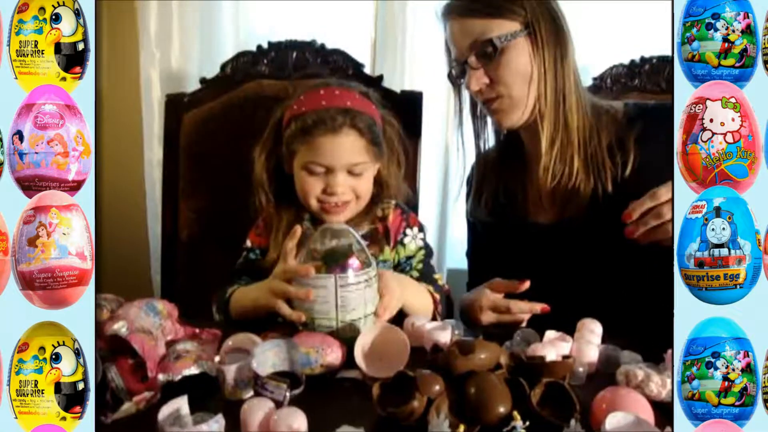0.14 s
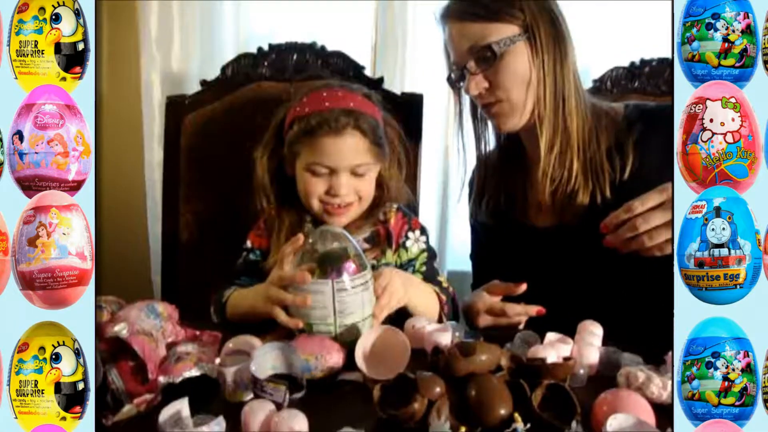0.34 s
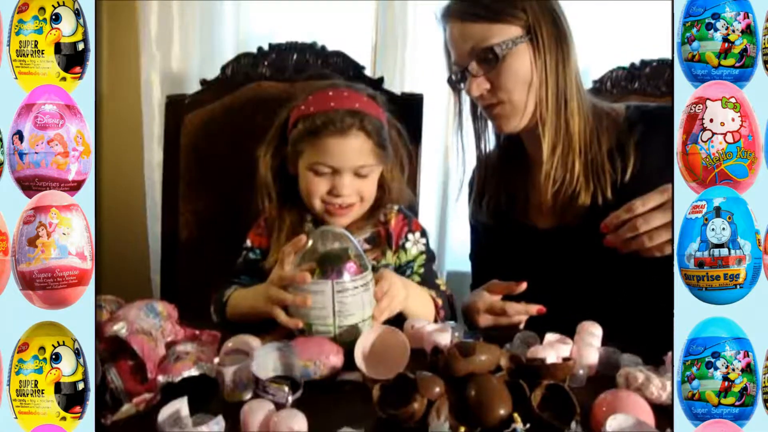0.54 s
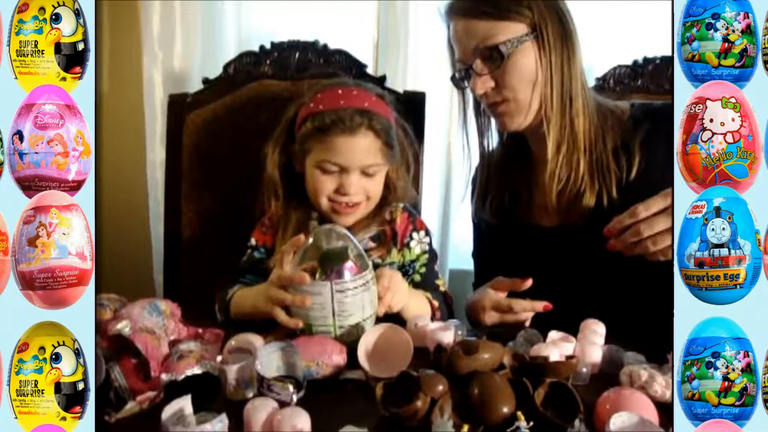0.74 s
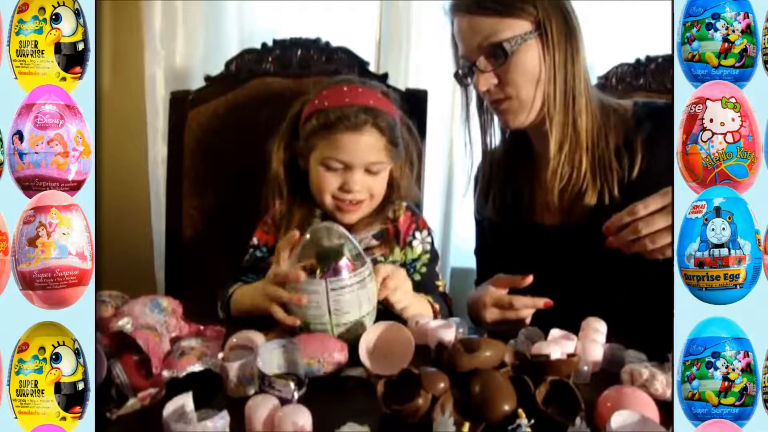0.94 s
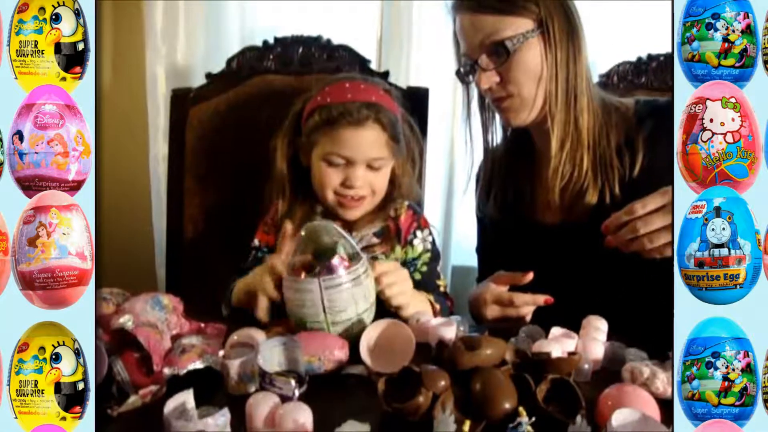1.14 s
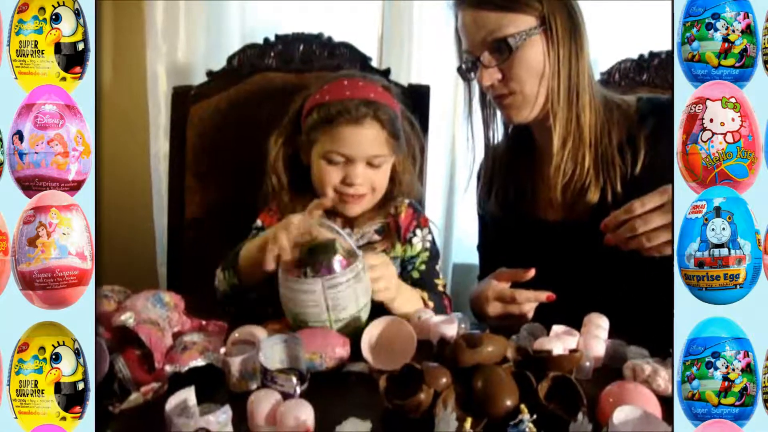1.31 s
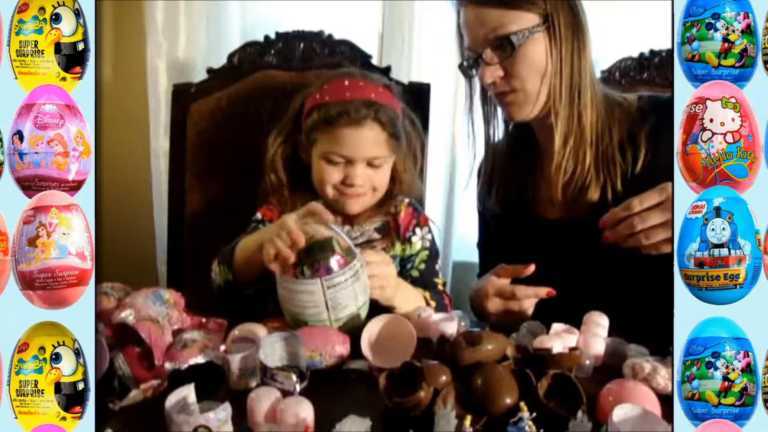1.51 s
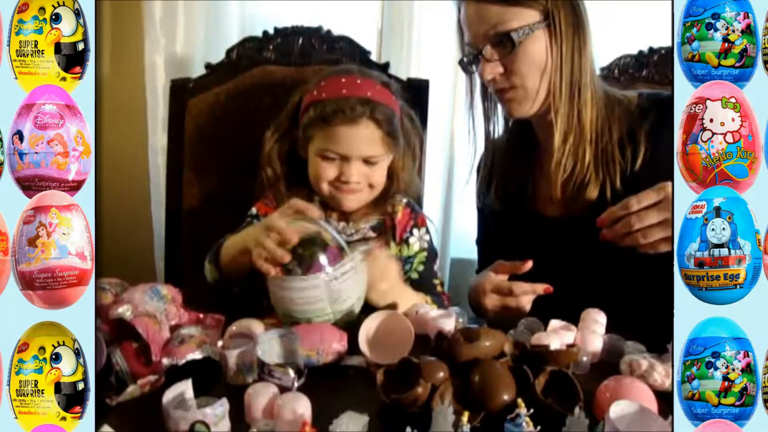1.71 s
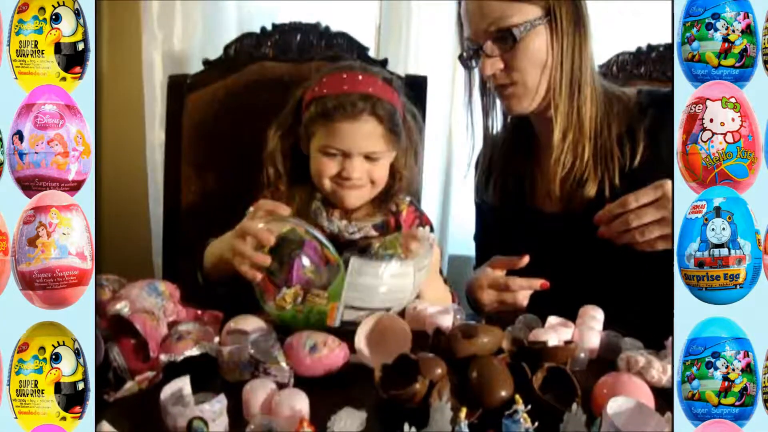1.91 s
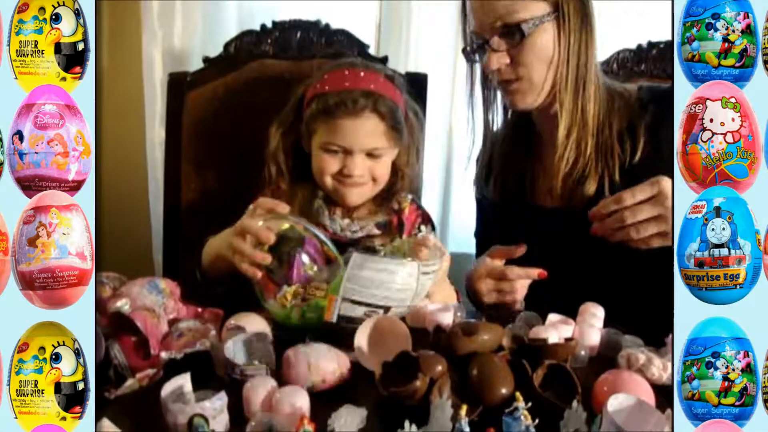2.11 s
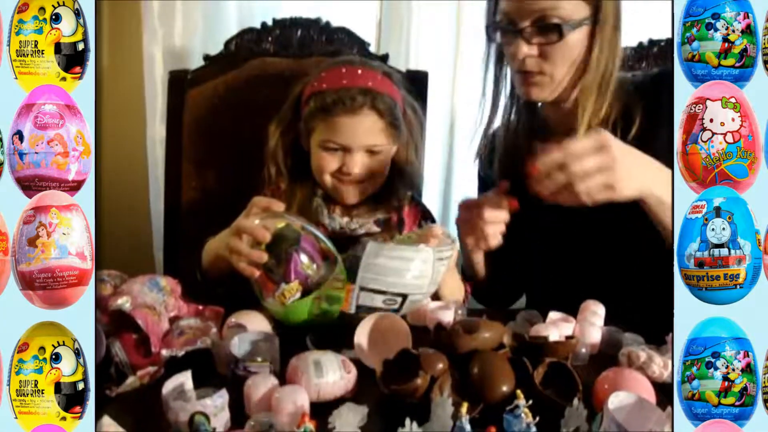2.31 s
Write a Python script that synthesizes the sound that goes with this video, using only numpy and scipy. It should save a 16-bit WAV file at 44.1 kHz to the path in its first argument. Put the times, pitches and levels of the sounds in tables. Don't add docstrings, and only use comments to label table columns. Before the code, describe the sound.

A taped hollow plastic egg is opened by hand. Light picking clicks quicken into a short tear near 0.45 seconds, jerky peeling crackles at 0.64 to 1.05, then sparser prying with a hard snap at 1.3. The halves give at 1.6 and rip loudly around 1.7 to 1.8; scattered snaps last until 2.05, with one faint tick at 2.25. Small room echo, dull table bumps, faint hum and hiss.

```python
import sys
import numpy as np
from scipy import signal
from scipy.fft import rfft, irfft, next_fast_len
from scipy.io import wavfile
from scipy.ndimage import uniform_filter1d

SR = 44100
rng = np.random.default_rng(int(sys.argv[2]) if len(sys.argv) > 2 else 0)


def volts_from_db(level):
    exponent = np.asarray(level, float) / 20
    return 10 ** exponent


def generate_wav(sig):
    pcm = np.round(np.clip(np.atleast_2d(sig).T, -1, 1) * 32767).astype(np.int16)
    wavfile.write(sys.argv[1], SR, pcm)


N = 103635
TOP_HZ = 10150


def unit(x):
    return x / np.sqrt(np.mean(x ** 2) + 1e-20)


def along(points, hz):
    f, value = np.transpose(points)
    return np.interp(np.log(hz + 1), np.log(f + 1), value)


def filtered(x, response):
    m = next_fast_len(len(x) + 8192)
    return irfft(rfft(x, m) * response(np.fft.rfftfreq(m, 1 / SR)), m)[:len(x)]


def place(times, sounds):
    at = np.round(times * SR).astype(int)[:, None] + np.arange(sounds.shape[1])
    return np.bincount(at.ravel(), sounds.ravel(), N + SR)[:N]


def fading(t, t60):
    rise_s = 0.00064
    return volts_from_db(-60 * t / t60) * (1 - np.exp(-t / rise_s))


# pitch_hz [Hz], level_db [dB per Hz]
HISS_SPECTRUM = [(15, -33.5), (25, -7), (172, -27.5), (233, 13.5), (284, 6.5), (996, 7.5), (1160, 5.5),
                 (2580, 6), (10000, -3.5), (13000, -58), (22000, -120)]
# pitch_hz [Hz], width_hz [Hz], level_db [dB]
HUM_BANDS = [(107.2, 10, -73), (163.5, 11, -76.5)]
# start_s [s], level_db [dB]
BACKGROUND_FADE = [
    (.5, 12),
    (.6, 5.5),
    (1.9, 2.5),
]


def background():
    hiss = unit(filtered(rng.standard_normal(N), lambda hz: volts_from_db(along(HISS_SPECTRUM, hz))))
    total = volts_from_db(-59.5) * hiss
    for centre, width, db in HUM_BANDS:
        band = filtered(rng.standard_normal(N), lambda hz: 1 / (1 + ((hz - centre) / width) ** 2))
        total = total + volts_from_db(db) * unit(band)
    return total * volts_from_db(np.interp(np.arange(N) / SR, *np.transpose(BACKGROUND_FADE)))


# start_s [s], level_db [dB]
JOLT_EVENTS = [
    (0.446, -34),
    (0.761, -41),
    (0.822, -54),
    (0.882, -41),
    (1.3189, -37),
    (1.51, -44),
    (1.588, -42.5),
    (1.69, -38.5),
]


def jolts():
    start_s, level_db = np.transpose(JOLT_EVENTS)
    t = np.arange(SR // 50) / SR
    peak_s = 0.0004
    return place(start_s, volts_from_db(level_db)[:, None] * t / peak_s * np.exp(1 - t / peak_s))


# pitch_hz [Hz], t60_s [s]
ROOM_DECAY = [(200, 0.063), (1000, 0.44), (4000, 0.3), (10000, .3)]
# delay_s [s], level_db [dB]
REFLECTIONS = [
    (.0065, -12.5),
    (.017, -16.5),
]


def room(x):
    out = np.zeros(N + SR)
    stretch = SR // 16
    span = SR // 2
    t = np.arange(span) / SR
    build_s, smear_s, tail_db, dull_hz = 0.0069, 0.00083, -7, 6940
    for a in range(0, N, stretch):
        hz, frame_s, z = signal.stft(rng.standard_normal(span), SR, nperseg=256)
        z = z * volts_from_db(-60 * frame_s / along(ROOM_DECAY, hz)[:, None])
        tail = signal.istft(z, SR, nperseg=256)[1][:span]
        tail = tail * (1 - np.exp(-(t / build_s) ** 2))
        tail = volts_from_db(tail_db) * tail / np.linalg.norm(tail)
        for delay_s, level_db in REFLECTIONS:
            echo = rng.standard_normal(span) * np.exp(-((t - delay_s) / smear_s) ** 2)
            tail = tail + volts_from_db(level_db) * echo / np.linalg.norm(echo)
        wet = signal.fftconvolve(x[a:a + stretch], tail)
        out[a:][:len(wet)] += wet
    return filtered(out[:N], lambda hz: 1 / (1 + 1j * hz / dull_hz))


# pitch_hz [Hz], level_db [dB per Hz]
FILM_COLOUR = [(120, -69.5), (200, -4.5), (468, -49), (552, -5), (844, -4), (1520, -2), (3570, 2.5),
               (7090, 0.5), (10000, -4.5), (13000, -53), (22000, -120)]


def film(x):
    def response(hz):
        colour = volts_from_db(along(FILM_COLOUR, hz))
        return colour / np.sqrt(np.mean(colour ** 2 * (hz < TOP_HZ)))
    return filtered(x, response)


RING_DB = 8
# start_s [s], end_s [s], level_db [dB]
TEARS = [
    (0.445, 0.478, -25),
    (1.581, 1.657, -29),
    (1.693, 1.794, -21),
]


def crackle(count=8, torn=150):
    trail_s, grain_db, spread_db, scatter_octaves = 0.02, -20, 1.5, 0.28
    shape = (len(SLIPS), count)
    begin_s, end_s, tear_db = np.transpose(TEARS)[:, :, None]
    tear_shape = (len(TEARS), torn)

    trailing_s = SLIPS[:, :1] + trail_s * rng.random(shape)
    trailing_db = SLIPS[:, 1:2] + RING_DB + grain_db - spread_db * np.log(rng.random(shape) + 0.14)
    slip_hz = SLIPS[:, 2 + np.arange(count) % 2]
    trailing_hz = slip_hz * 2 ** (scatter_octaves * rng.standard_normal(shape))

    tearing_s = begin_s + (end_s - begin_s) * rng.random(tear_shape)
    tearing_db = tear_db + 2 * spread_db * rng.standard_normal(tear_shape)
    tearing_hz = 1000 * 2 ** rng.uniform(0, np.pi, tear_shape)

    start_s = np.append(trailing_s, tearing_s)
    level = volts_from_db(np.append(trailing_db, tearing_db))[:, None]
    hz = np.append(trailing_hz, tearing_hz)[:, None]
    t = np.arange(SR // 200) / SR
    ping = 2 * np.sin(2 * np.pi * hz * t) + 0.82 * rng.standard_normal((len(hz), len(t)))
    return film(place(start_s, level * fading(t, 0.0039) * ping))


# pitch_hz [Hz], level_db [dB]
SHELL_MODES = [(590, -2.5), (820, 2.5), (1150, 0)]
# [dB, shell over snap]
PICKING = [(0.055, -30, 3120, 6520.0, -3.5), (0.1143, -29, 3000, 5580.0, -8),
           (0.1323, -33.5, 5300, 5900.0, -4), (0.1491, -43, 2730.0, 3900.0, -3),
           (0.164, -56, 3060, 3750.0, -20), (0.1725, -23, 2980, 3940.0, -22),
           (0.1807, -33, 3010.0, 5660.0, -13), (0.19, -27, 3070, 5080.0, -8.5),
           (0.214, -15.5, 3200, 5280.0, -9), (0.2642, -28, 2920, 5120.0, 3.5),
           (0.2796, -19.5, 3010.0, 2200.0, -7.5), (0.2843, -27.5, 5020, 2950.0, -24),
           (0.2891, -22.5, 2600, 5750.0, -24), (0.3108, -27.5, 2950.0, 4260.0, -16),
           (0.3219, -25, 2680, 6630.0, -27), (0.3373, -15.5, 5460, 6890.0, -30),
           (0.3449, -39, 4760, 6240.0, -20), (0.354, -48, 4520, 2630.0, -20),
           (0.4072, -40.0, 2620, 4740.0, 8.0), (0.4346, -25.5, 2720, 4460.0, -7.5),
           (0.4408, -35, 2830, 5320.0, -5.0), (0.445, -13.5, 6120, 5080.0, -12),
           (0.4515, -14.5, 6850, 5320.0, -6.5), (0.4612, -12.5, 3800, 2840.0, -14.5),
           (0.4674, -11.5, 3700, 5600.0, -6.5), (0.4709, -10.5, 6840, 2370.0, -13),
           (0.4966, -20.0, 3570, 5060.0, -10), (0.5375, -25, 2420, 5600.0, -22)]
# start_s, level_db, pitch_hz, second_pitch_hz [Hz], knock_db
PEELING = [(0.6401, -25.5, 6760.0, 2350, -5.5), (0.6449, -11, 6420, 2610, -9),
           (0.6547, -35, 3810, 7300, -26), (0.6632, -33, 4300, 2530, -10.5), (0.671, -13.5, 3150, 4920, -5),
           (0.6771, -14.5, 5310, 2550, -16), (0.6854, -17.5, 2510, 3450, -37),
           (0.7115, -19, 3540, 6030, -3.5), (0.7162, -13, 3260, 5970, -5),
           (0.7334, -17.5, 3610, 5370, -4.5), (0.7497, -18.5, 3080, 4710, -24),
           (0.759, -10.5, 4700, 5540, -8.5), (0.7635, -16.0, 4850, 3010, -21),
           (0.774, -19.5, 5070, 3320, -5.0), (0.7923, -14.0, 5630, 4450, -12),
           (0.8143, -12.0, 4880, 7080, -4.5), (0.8306, -20, 4510, 7200, 3),
           (0.8386, -16, 4570.0, 3650, -29), (0.8444, -20.5, 2470, 4680, -8.5),
           (0.8754, -17, 6520, 2890, -12.5), (0.8822, -15.5, 2500, 3440, -11.5),
           (0.8967, -21.5, 2380, 3470, -27), (0.9433, -30.5, 3530, 7130, -10),
           (0.963, -28.5, 3360, 2540, -8), (0.968, -22.5, 6610, 2400, -6),
           (0.9935, -15.0, 5580, 2680, -3.5), (1.0065, -14.5, 2700, 4600, -10.5),
           (1.014, -12.5, 4600, 3550, -8.5), (1.0209, -9.5, 3740, 4790, -11),
           (1.0321, -19, 4750, 2500, -8.5), (1.0478, -23.5, 4700, 2720, -15.0),
           (1.0658, -28, 5030, 2980, -17.0)]
# start_s, level_db, pitch_hz, second_pitch_hz [Hz], knock_db
PRYING = [(1.1122, -28, 3380, 2980, -2.5), (1.1246, -43, 4600, 3700, -14), (1.1549, -25, 4810, 5800, -4),
          (1.161, -38, 5870, 4650, -11), (1.1857, -41.5, 3560, 5650, -9), (1.208, -35, 4620, 3030, -27),
          (1.2324, -26, 3570, 2190, -8), (1.2396, -40.5, 3700, 4840, -30), (1.248, -47, 3790.0, 4540, -17),
          (1.2605, -56.5, 4240.0, 2600, -20), (1.2739, -24, 3510, 2350, -3.5),
          (1.2842, -14, 3820, 4460, -34), (1.3013, -25, 3230.0, 2360, -26),
          (1.315, -6.5, 3580, 5990, -18.5), (1.3221, -16.0, 3660, 4920, -43),
          (1.3328, -14.5, 3260, 4380, -16), (1.3396, -19.0, 3600, 4950.0, -20),
          (1.403, -28, 3580, 5670, -43), (1.4405, -29.5, 3660, 2050.0, -7.5),
          (1.4629, -24.0, 5100, 3660, -6.5), (1.47, -20.5, 3580, 4660, -49), (1.4815, -17, 5690, 3800, -11),
          (1.4999, -24, 6370.0, 5150, -17.5), (1.5106, -14.5, 4140, 2680, -19.0),
          (1.52, -14.5, 3500, 5950, -14), (1.5255, -14, 3400, 5450, -19), (1.5699, -16.5, 4800, 3530, -17),
          (1.59, -15, 5570, 3330, -17), (1.5953, -13, 7240, 2850, -15), (1.6213, -19.5, 5380.0, 7100, -17),
          (1.625, -17.5, 5580, 6300, -15), (1.634, -21, 5800, 4750, -8), (1.6634, -17, 5340, 8740, -20)]
# start_s, level_db, pitch_hz, second_pitch_hz [Hz], knock_db
RIPPING = [(1.6894, -10, 4200, 6790, -16), (1.6941, -10.5, 5170, 7370, -57),
           (1.6989, -16.5, 6600, 5130, -15), (1.7068, -16, 5600, 3000, -14),
           (1.7287, -13.5, 5110, 4240, -11), (1.7461, -17, 5000, 2770, -8), (1.7589, -12.5, 2970, 4170, -4),
           (1.795, -10.5, 3100, 5150, -15.5), (1.8071, -17.5, 2460, 5130, -18),
           (1.842, -19, 3060, 2010, -11.5), (1.8787, -29, 2350.0, 4670, -13),
           (1.9339, -18.5, 6940, 3400, -34), (1.9377, -19.5, 5600, 2140, -37),
           (1.9538, -26, 2400, 3930, -24), (1.9623, -30, 5640, 3730.0, -28),
           (1.9743, -11.5, 5100, 7620, -15), (1.9872, -12, 2390, 4570, -11.5),
           (1.9933, -22.5, 3450, 2330, -32), (1.9985, -19, 2400, 4100, -29), (2.0206, -9, 3870, 2260, -15),
           (2.0312, -12.5, 2500, 5495, -22), (2.0511, -26, 2390, 3900, -27),
           (2.2498, -34.5, 4330, 8100, -11.5)]
# start_s, level_db, pitch_hz, second_pitch_hz [Hz], knock_db
FURTHER = [
    (0.7197, -18.5, 4300, 3050, -4),
    (1.3637, -19, 3300, 4920, -4),
    (1.7265, -10.5, 5440, 6620, -19),
]
SLIPS = np.concatenate([PICKING, PEELING, PRYING, RIPPING, FURTHER])


def snaps():
    start_s, level_db, pitch_hz, second_hz, knock_db = SLIPS.T[:, :, None]
    count = len(SLIPS)
    t = np.arange(SR // 30) / SR
    noise, flicker = rng.standard_normal((2, count, len(t)))
    crack_s, ring_s, knock_s, lead_s = 0.012, 0.0066, 0.016, 0.002

    crack = volts_from_db(level_db - 3) * fading(t, crack_s) * noise
    lead = volts_from_db(-8.5 + 2 * rng.standard_normal((count, 1))) * crack * np.sign(flicker)

    flutter = 1 + 0.25 * 4 * uniform_filter1d(flicker, size=16, axis=1)
    tones = np.sin(2 * np.pi * pitch_hz * t) + volts_from_db(-3) * np.sin(2 * np.pi * second_hz * t)
    ring = volts_from_db(level_db + RING_DB) * flutter * tones * fading(t, ring_s)

    knock = np.zeros((count, len(t)))
    for mode_hz, mode_db in SHELL_MODES:
        mode_level = level_db + knock_db + 1.5 + mode_db + 2 * rng.standard_normal((count, 1))
        hz = mode_hz * (1 + 0.098 * rng.standard_normal((count, 1)))
        knock += volts_from_db(mode_level) * np.sin(2 * np.pi * hz * t)
    knock *= fading(t, knock_s)

    start = start_s[:, 0]
    slips = film(place(start, crack) + place(start - lead_s, lead)) + place(start, ring + knock)
    small_hz = 390
    return filtered(slips, lambda hz: (1j * hz / (small_hz + 1j * hz)) ** 2)


def scene():
    egg = snaps() + crackle()
    return (egg + room(egg) + jolts() + background())[None]


def starved(x):
    block, ahead, behind, group = 160, 5, 6, 7
    attack_db, step_db, scatter_db = 7, -6.5, 3.5
    fine_hz, fine_db = 4800, -12

    def nearby(v):
        return np.max([np.roll(v, k, axis=-1) for k in range(-ahead, behind + 1)], axis=0)

    hz, _, z = signal.stft(x, SR, window="cosine", nperseg=2 * block)
    treble = z[(hz > 2000) & (hz < TOP_HZ)]
    level = np.sqrt(np.mean(abs(treble) ** 2, axis=0)) + 1e-9
    jump = level / np.minimum(np.roll(level, 2), np.roll(level, 3))

    band = np.arange(len(hz)) // group
    power = np.add.reduceat(abs(z) ** 2, np.arange(0, len(hz), group)) / group
    rms = np.sqrt(power) + 1e-9
    broad = np.sqrt(abs(uniform_filter1d(rms ** 2, size=3, axis=0))) + 1e-9
    step = (nearby(broad) * volts_from_db(step_db + scatter_db * rng.standard_normal(rms.shape)))[band]
    octaves = np.log2(fine_hz / (hz + 1))
    step = step * volts_from_db(fine_db * (np.clip(4 * octaves, 0, 1) + octaves.clip(0)))[:, None]

    coarse = np.round(z / step) * step * (rms[band] > step / 2) + volts_from_db(-30) * z
    mixed = np.where(nearby(jump) > volts_from_db(attack_db), coarse, z)
    return signal.istft(mixed, SR, window="cosine", nperseg=2 * block)[1][:N]


def top_cut(x):
    return signal.sosfilt(signal.butter(12, 11120, fs=SR, output="sos"), x)


def record(dry):
    soft = dry[0] / (1 + abs(dry[0] / 0.95) ** 6) ** (1 / 6)
    kept = filtered(starved(soft), lambda hz: 1 / (1 + (hz / TOP_HZ) ** 120))
    return top_cut(kept[None])


dry = scene()
out = record(dry)
generate_wav(out)
```